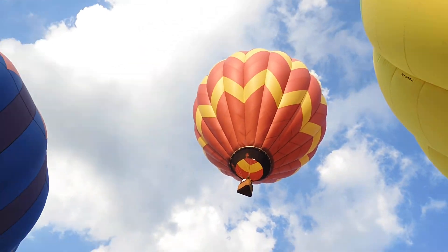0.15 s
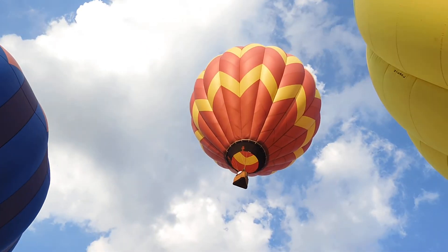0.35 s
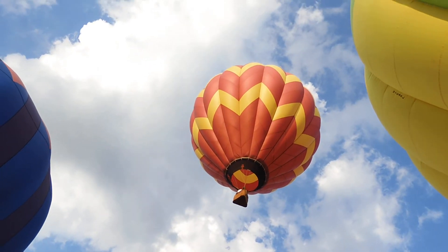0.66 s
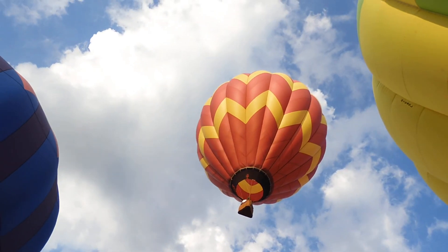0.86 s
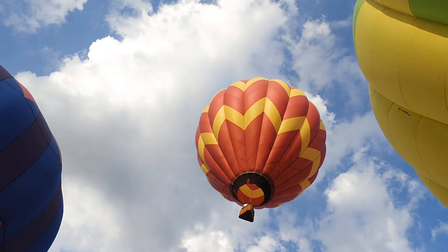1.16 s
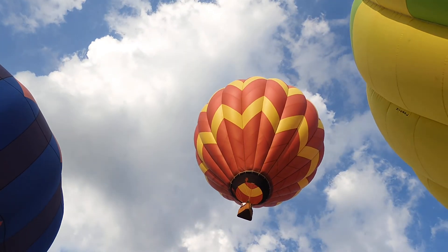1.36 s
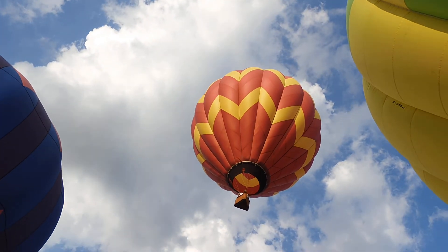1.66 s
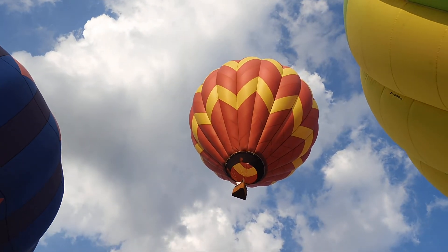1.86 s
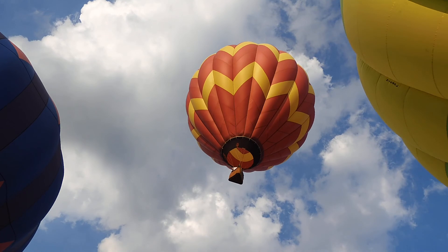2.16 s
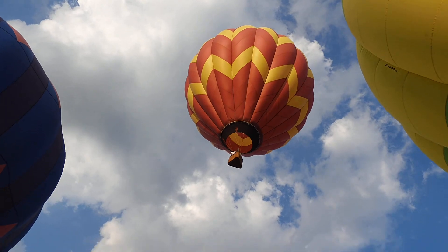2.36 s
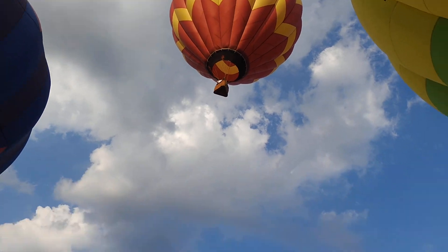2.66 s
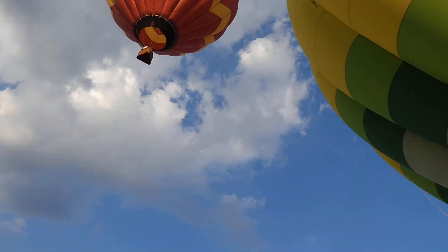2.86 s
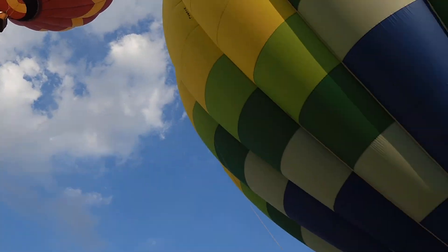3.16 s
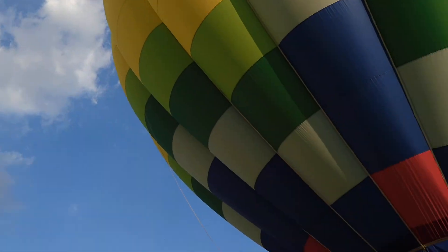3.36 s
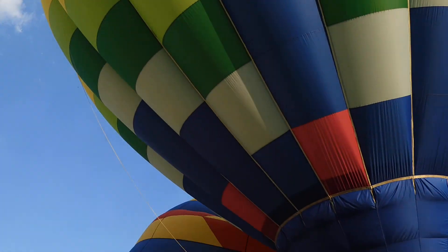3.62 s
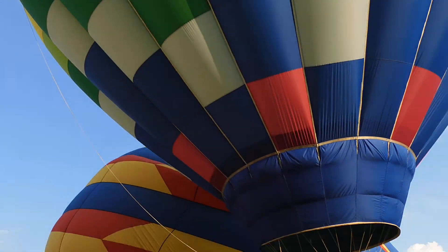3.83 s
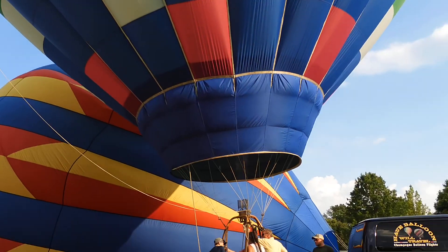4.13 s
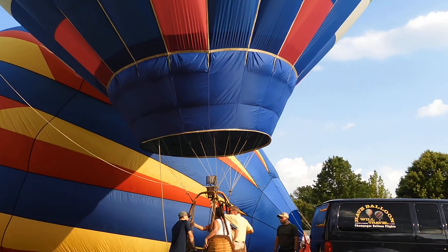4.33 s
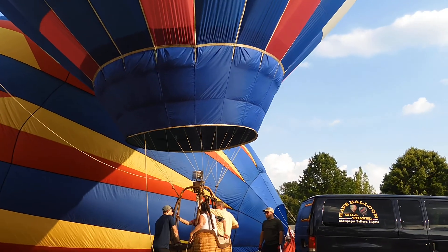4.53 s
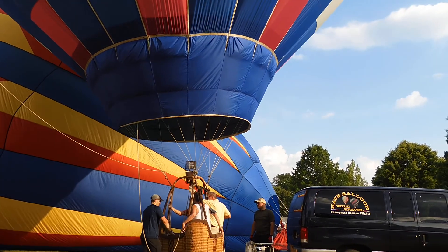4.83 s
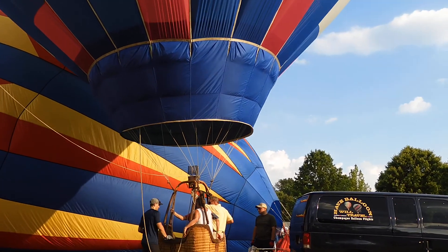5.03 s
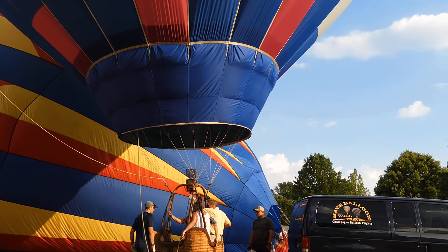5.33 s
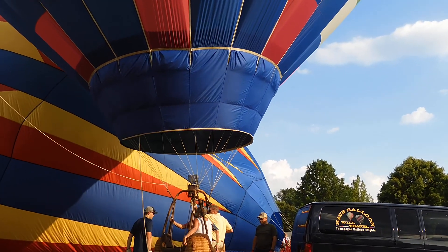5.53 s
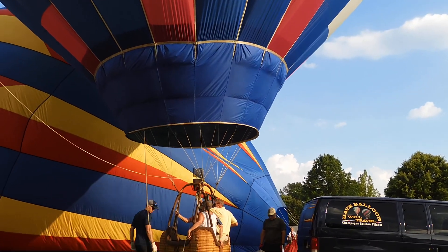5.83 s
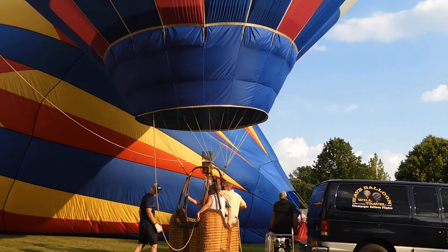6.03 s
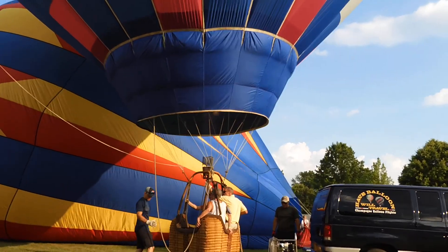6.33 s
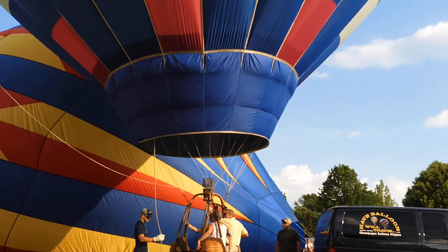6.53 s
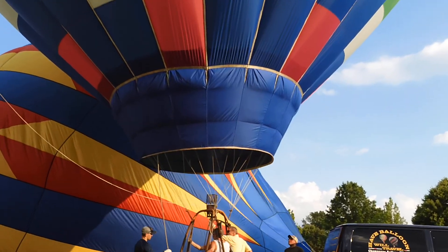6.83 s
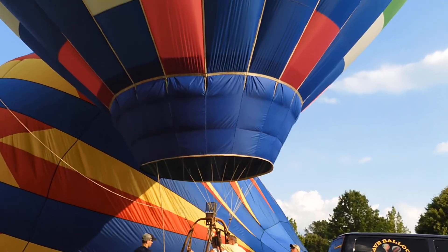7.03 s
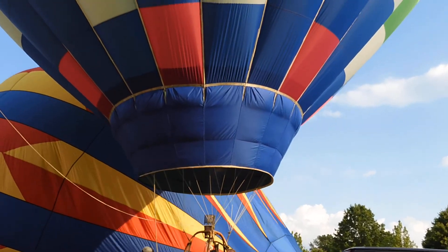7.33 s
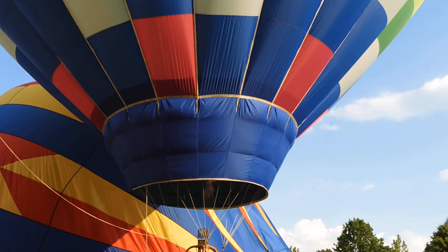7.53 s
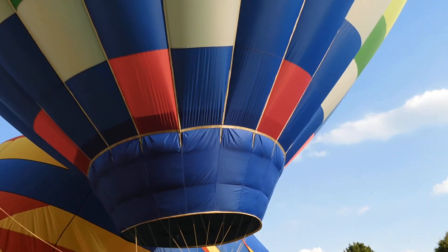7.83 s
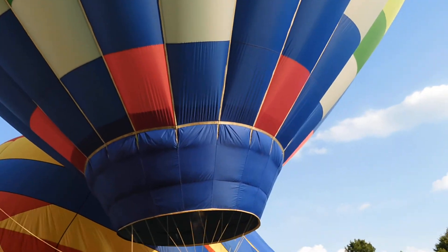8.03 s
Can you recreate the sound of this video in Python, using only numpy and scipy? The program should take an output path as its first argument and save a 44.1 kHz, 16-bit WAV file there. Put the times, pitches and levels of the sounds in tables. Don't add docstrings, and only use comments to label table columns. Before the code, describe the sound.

From 0 to 4 seconds, a nearby petrol inflation fan drones on an open field: a rough buzzing whirr around a low blade pitch with strong midrange overtones, fast slaps of air and a broad rushing wash. A weaker fan beats faintly behind it, over soft lumpy wind rumble. Around 3 seconds the camera's stereo microphone turns away and the fan grows duller and softer. At 4.0 seconds a propane burner lights with a short low thump and swells almost at once into a loud, dense hiss, spitting and brightest at first, with metallic ringing colour and fluttering flame roar. It masks the fan and sags slightly. Near 7.4 seconds the valve closes and the hiss drops away within a few tenths. The muffled fan drone resurfaces until about 7.9 seconds, when a second, slightly weaker blast rushes in and continues to the end.

```python
import sys
import numpy as np
from scipy import signal
from scipy.fft import rfft, irfft
from scipy.io import wavfile
from scipy.ndimage import uniform_filter1d

SR = 44100
rng = np.random.default_rng(int(sys.argv[2]) if len(sys.argv) > 2 else 0)


def invert_db(level):
    return 10 ** (np.asarray(level, dtype=float) / 20)


def to_wav(s):
    ch = np.atleast_2d(s).T
    pcm = np.round(np.clip(ch, -1, 1) * 32767)
    wavfile.write(sys.argv[1], SR, pcm.astype(np.int16))


N = 360738
FRAME, HOP = 1024, 256
HZ = np.fft.rfftfreq(FRAME, 1 / SR)[:, None]
FRAME_S = np.arange(N // HOP + 6) * HOP / SR


def evened(x):
    return x / np.sqrt(np.mean(abs(x) ** 2) + 1e-20)


def read(points, hz):
    f, value = np.transpose(points)
    return np.interp(np.log(hz + 1), np.log(f + 1), value)


def columns(rows, t):
    s, *values = np.transpose(rows)
    return [np.interp(t, s, v) for v in values]


def swells(rows, t):
    return sum(db * np.exp(-((t - s) / half_s) ** 2) for s, half_s, db in rows)


def hump(hz, width_hz):
    return 1 / (1 + (2 * (HZ - hz) / width_hz) ** 2)


def unit(shape):
    return shape / np.sqrt((shape ** 2).sum(0) * 3 / 4)


def drift(seconds, bins):
    field = rng.standard_normal((len(FRAME_S), len(HZ))).T
    over_time = uniform_filter1d(field, max(1, int(seconds * SR / HOP)), 1)
    return evened(uniform_filter1d(over_time, int(bins), 0))


def noise(magnitude, same, balance, lead=((1, 0), (2, 0))):
    a, b, c, d = rng.standard_normal((len(FRAME_S), len(HZ), 4)).T
    like = np.clip(read(same, HZ), 0, 1)
    left = a + 1j * b
    right = like * left + np.sqrt(1 - like ** 2) * (c + 1j * d)
    right = right * np.exp(-1j * read(lead, HZ))
    side_gain = invert_db(read(balance, HZ) / 2)
    z = np.array([left * side_gain, right / side_gain]) * magnitude
    return signal.istft(z, nperseg=FRAME, noverlap=FRAME - HOP)[1][:, :N]


# time in seconds, half length in
# seconds, centre in Hz, lift in dB (negative lowers).
ECHO_LIFTS = [(0.19, 0.33, 1020, 15), (0.5, .2, 1680, 9.5), (1.2, 0.56, 1840, 5), (1.84, 0.14, 1450, 5),
              (2.62, 0.47, 1330, 7), (0.91, 0.27, 1460, 1.5), (2.6, 0.55, 1900, -7),
              (3.785, 0.18, 1232, 19), (6.0, 2.1, 224, -14), (7.0, 0.63, 1397, 10),
              (7.775, 0.086, 1510, 14), (1.1, 0.45, 1130, 4), (0.79, 0.37, 1130, -11), (1.4, .4, 1460, 1)]


def tones(table, turns, wander_db, slip):
    t = np.arange(N) / SR
    out = np.zeros(N)
    slow, quick = drift(0.36, 1), drift(.08, 1)
    for row, (multiple, hz, db) in enumerate(table):
        lifts = [(s, half_s, top_db * np.exp(-((hz - at_hz) / 65) ** 2))
                 for s, half_s, at_hz, top_db in ECHO_LIFTS]
        fade_db = wander_db * np.minimum(slow[row] + 1.7 * quick[row + 40], 1.3)
        level_db = db - 1.5 + swells(lifts, FRAME_S) + fade_db
        shifted_turns = turns + np.interp(t, FRAME_S, slip * quick[row])
        phase = multiple * shifted_turns + 0.27 * rng.random()
        out += np.interp(t, FRAME_S, invert_db(level_db)) * np.cos(2 * np.pi * phase)
    return out


# multiple of the blade rate, level in dB.
BLADE_TONES = [(1, -12), (2, -11), (3, -15.5), (4, -21.5), (5, -13.5), (6, -22), (7, -18.5), (8, -8),
               (9, -11), (10, 0), (11, -4), (12, 1.5), (13, 2.5), (14, 0), (15, -5), (16, 0.5), (17, 3)]
# multiple of the engine cycle rate, level in dB.
ENGINE_TONES = [(2, -33), (5, -29), (10, -28), (11, -31), (14, -23.5), (21, -30), (41, -32), (47, -20.5),
                (51, -14), (59, -3)]
# frequency in Hz, level in dB per Hz.
WASH_COLOUR = [(18, -70), (30, -43), (103, -39), (227, -20), (249, -28), (333, -14), (365, -33),
               (547, -25.5), (839, -21.5), (1200, -9.5), (2830, -6.5), (4140, -15), (6500, -23),
               (8450, -64), (14300, -120)]
SLAP_COLOUR = [(1800, -21), (2600, -23), (3500, -1.5), (4600, 1), (5600, -2.5), (7500, -20), (10000, -41)]
HIGHS_COLOUR = [(2940, -20), (5000, -7.5), (6970, -10), (8480, -14.5), (10500, -33.5), (13600, -60),
                (22000, -120)]
# frequency in Hz, likeness (1 alike).
SLAP_SAME = [(60, 0.96), (120, 1), (240, 0.99), (480, 0.96), (950, 0.94), (1890, 1), (3770, 0.95),
             (7520, 1), (15000, -0.57)]
WASH_SAME = [(60, 0.94), (120, 1), (240, 0.96), (480, 0.95), (950, 0.98), (1890, 0.98), (3770, 0.94),
             (7520, 0.26), (15000, 0.028)]
# frequency in Hz, left minus right in dB.
FAN_BALANCE = [(60, -2), (700, 2), (2400, 0), (4400, 0), (6400, 1), (7500, 8), (8500, 5), (11000, 12),
               (14000, 2)]
# time in seconds, off axis (0-1), highs let past the camera body in dB.
FACING = [(0, 0.06, -1.5), (1.06, 0.1, -2), (2.3, 0, -0.5), (2.82, 0.02, 1.5), (3.08, 0.24, -3.5),
          (3.25, 0.33, -2.5), (3.45, .5, 1), (3.9, 0.45, 1), (7.7, 0.76, -3)]
# time in seconds, half length in seconds, left minus right in dB.
SWING = [(3.1, 0.29, -1.6)]


def fan():
    t = np.arange(N) / SR
    blade_hz = 111.9
    turns = 0.8 + blade_hz * t
    off, let_db = columns(FACING, FRAME_S)
    wash_db = -33 - 0.5 * off
    slap_db = -27.5 - 22.5 * off
    slap_pitch = 0.95 - 0.25 * off

    wash = unit(invert_db(read(WASH_COLOUR, HZ))) * invert_db(wash_db + 5.5 + 1.16 * drift(.1, 21))
    wash *= invert_db(2.6 * hump(2440, 410) * (FRAME_S > 7.35))
    wash *= invert_db(0.089 * (slap_db + 30.5) * hump(480, 540))
    wash *= invert_db(-8.0 * off * hump(230, 60))
    highs = unit(invert_db(read(HIGHS_COLOUR, HZ))) * invert_db(let_db - 40)
    slap = unit(invert_db(read(SLAP_COLOUR, HZ / slap_pitch))) * invert_db(slap_db + 0.42 * drift(.04, 40))

    passes = np.arange(int(turns[-1]) + 2)
    each_db = 1.3 * rng.standard_normal(len(passes)) + 0.67 * np.cos(np.pi / 2 * passes)
    pulse = .5 + np.exp(1.5 * (np.cos(2 * np.pi * (turns - .5)) - 1))
    burst = evened(pulse * invert_db(np.interp(turns - .5, passes, each_db)))

    blade_table = [(k, k * blade_hz, db) for k, db in BLADE_TONES]
    engine_table = [(k / 4, k * blade_hz / 4, db) for k, db in ENGINE_TONES]
    blades = tones(blade_table, turns - .55, wander_db=2.6, slip=0.01)
    engine = tones(engine_table, turns, wander_db=5.0, slip=0.0028)
    other_fan = invert_db(-18) * np.cos(2 * np.pi * (0.78 + 107.5 * t))
    tone_gain = np.interp(t, FRAME_S, invert_db(wash_db - 5.5 - 3.5 * off))

    air = noise(np.hypot(wash, highs), WASH_SAME, FAN_BALANCE)
    air = air + burst * noise(slap, SLAP_SAME, FAN_BALANCE)
    pan_db = np.interp(t, FRAME_S, 0.36 + swells(SWING, FRAME_S))
    sides_db = pan_db * np.array([[.5], [-.5]])
    return invert_db(sides_db) * (air + tone_gain * (blades + engine + other_fan))


# frequency in Hz, level in dB per Hz.
RUMBLE_COLOUR = [(12, -50), (20, -29), (48, -5.5), (114, -0.5), (150, 0.5), (180, 5), (220, -23),
                 (280, -21), (460, -120)]
# time in seconds, half length in seconds, change in dB.
GUSTS = [(.6, .5, 0), (2.7, .15, 5), (3.3, 0.7, -8), (4.4, 0.53, 6), (6.8, 0.16, 8), (8.1, 0.73, 3),
         (5.5, 1.6, 2.5)]


def rumble():
    hz, t = np.fft.rfftfreq(N, 1 / SR), np.arange(N) / SR
    spectra = rfft(rng.standard_normal((2, N))) * invert_db(read(RUMBLE_COLOUR, hz))
    middle, side = evened(irfft(spectra, N))
    lumps_db = np.interp(t, FRAME_S, 1.5 * drift(0.095, 500)[0])
    level_db = -52.5 + swells(GUSTS, t) + lumps_db
    return invert_db(level_db) * (middle + .16 * side * np.array([[1], [-1]]))


# frequency in Hz, level in dB per Hz.
HISS_COLOUR = [(5590, -28), (9500, -6), (10300, -2), (14000, -10), (14800, -23), (15400, -25)]


def hiss():
    hz = np.fft.rfftfreq(N, 1 / SR)
    spectra = rfft(rng.standard_normal((2, N))) * invert_db(read(HISS_COLOUR, hz))
    return invert_db(-61.5) * evened(irfft(spectra, N))


# opens in seconds, starts to close in seconds, rise in seconds, jet level in dB.
BLASTS = [
    (3.99, 7.378, 0.11, -16.5),
    (7.906, 9.0, 0.088, -18),
]


def flow(t, late_s=0., steep=0.77, quick=0.87):
    level_db, age = np.full(len(t), -120.), np.zeros(len(t))
    for opens, closes, rise, db in BLASTS:
        since = np.maximum(t - opens, 0)
        shut_db = steep * 216 * np.maximum(t - closes - late_s, 0) ** 2
        opening = 1 - np.exp(-(since / (quick * rise)) ** 1.64)
        open_db = 20 * np.log10(opening + 1e-6)
        sag_db = 0.67 * since
        level_db = np.maximum(level_db, db + open_db - sag_db - shut_db)
        age = np.where(t > opens, since, age)
    return level_db, age


# frequency in Hz, level in dB per Hz.
JET_COLOUR = [(650, -22.5), (1100, -7.5), (1380, -8.5), (1640, -8.5), (2260, -1.5), (2590, -3.5),
              (2810, -1), (3080, -2.5), (4550, -1.5), (5110, -3), (8000, -13.5), (10400, -34),
              (17600, -120)]
FIZZ_COLOUR = [(3240, -18), (5500, -2.5), (10500, -16), (13300, -21), (15500, -29.5)]
# frequency in Hz, width in Hz, height in dB.
ECHO_RIDGES = [(2400, 360, -0.5), (2774, 62, 5.5), (3150, 110, 5), (3630, 130, 2.5)]
# frequency in Hz, width in Hz, depth in dB.
HOLLOW = (760, 410, -5.5)
# time in seconds, pitch factor, depth factor.
TIPPED = [(4, 1.13, 0.18), (4.6, 1.05, 0.45), (5.2, 1.12, 0.34), (5.8, 1.04, 1.2), (6.4, 0.95, 1.3),
          (6.9, 1, 1.05), (7.35, 1, 1.4), (7.6, 1.08, 0.58), (8.2, 1.09, 0.19)]
# time in seconds, tipped up (0-1).
TILT = [(4, 0.7), (4.6, 0.4), (5.2, 0.08), (6.1, 0.2), (6.9, 0.5), (7.5, 0.64), (8.2, 1)]
# frequency in Hz, likeness (1 alike).
JET_SAME = [(60, 1), (120, 1), (240, 0.92), (480, 0.99), (950, 0.98), (1890, 1), (3770, 0.98), (7520, 0.95),
            (15000, 0.29)]
# frequency in Hz, left minus right in dB.
JET_BALANCE = [(60, -8), (500, 1.5), (2400, 1), (5000, -0.5), (6500, -1.5), (7600, -6), (8500, 8.5),
               (9500, 11.5), (11000, 10.5), (12500, -5)]
# frequency in Hz, phase by which left leads in radians.
JET_LEAD = [(5000, 0.085), (6000, -0.45), (7060, 0.5), (8180, 0.5), (9220, -0.55), (10700, -0.6)]


def burner():
    jet_db, age = flow(FRAME_S)
    up = columns(TILT, FRAME_S)[0]
    tip, depth = columns(TIPPED, FRAME_S)
    burnt = FRAME_S - BLASTS[0][0]
    flutter = drift(.12, 500)
    gust = drift(0.15, 320)

    ridges_db = sum(db * hump(hz * tip, width) for hz, width, db in ECHO_RIDGES)
    echo_db = depth * ridges_db + 1.6 * hump(5360, 1200)
    jet = unit(invert_db(read(JET_COLOUR, HZ) + echo_db))
    jet = jet * invert_db(jet_db + 0.73 + 0.35 * gust + 0.7 * drift(0.1, 12))

    fizz_db = flow(FRAME_S, late_s=0.12, steep=5.4, quick=1)[0] - 13 + 5 * np.exp(-age / 2.5)
    fizz = unit(invert_db(read(FIZZ_COLOUR, HZ))) * invert_db(fizz_db + 1.3 * gust + 2.0 * drift(0.033, 40))
    fizz *= invert_db(9.0 * np.exp(-age / .13) * hump(13000, 4600))

    no_bass = 1 / (1 + (268 / (HZ + 1)) ** 11)
    roar_hz = 520 + 39 * burnt
    roar_db = flow(FRAME_S, late_s=0.17, steep=2.4)[0] - 14.76 + 7.0 * up + 0.32 * flutter
    roar = unit(no_bass * hump(roar_hz, 600)) * invert_db(roar_db + 1.07 * drift(.03, 19))

    coil_db = jet_db - 28.5 + 6 * up + 4.0 * np.minimum(burnt, 2.8) + 2.2 * flutter[:, ::-1]
    coil = unit(hump(1408 * tip, 250)) * invert_db(coil_db + 0.92 * drift(.03, 20))

    hollow_hz, hollow_width_hz, hollow_db = HOLLOW
    hollow = invert_db(depth * hollow_db * hump(hollow_hz + 47 * age, hollow_width_hz))
    layers = np.sqrt(jet ** 2 + fizz ** 2 + roar ** 2 + coil ** 2)
    return noise(hollow * np.sqrt(no_bass) * layers, JET_SAME, JET_BALANCE, JET_LEAD)


# start in seconds, peak in dB, frequency in Hz, 60 dB decay in seconds.
IGNITION = [
    (4.002, -28.5, 75, 0.064),
    (4.003, -35, 190, .04),
]


def ignition():
    out = np.zeros(N)
    for s, db, hz, t60 in IGNITION:
        t = np.maximum(np.arange(N) / SR - s, 0)
        out += invert_db(db - 60 * t / t60) * np.sin(2 * np.pi * hz * t)
    return out


def scene():
    t = np.arange(N) / SR
    loud = np.clip((flow(t)[0] + 19.5) / 8, 0, 1)
    return invert_db(-15 * loud) * fan() + rumble() + burner() + ignition()


def roll_off(x):
    return signal.sosfilt(signal.butter(12, 15660, fs=SR, output="sos"), x)


def record(dry):
    low_cut = signal.butter(2, 40, "high", fs=SR, output="sos")
    mix = signal.sosfilt(low_cut, dry + hiss())
    return roll_off(mix)


dry = scene()
out = record(dry)
to_wav(out)
```